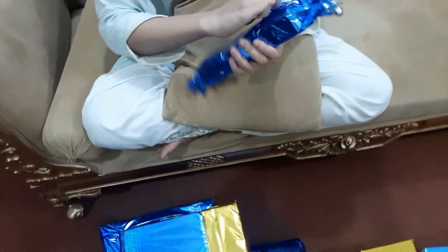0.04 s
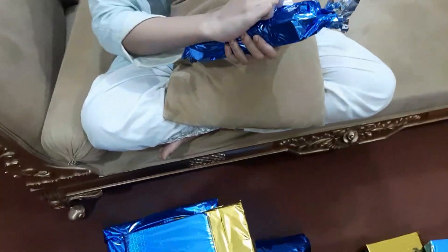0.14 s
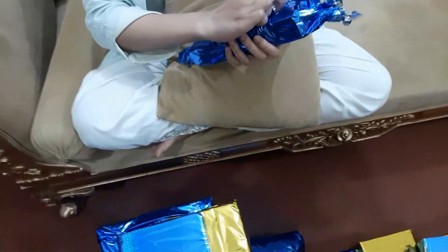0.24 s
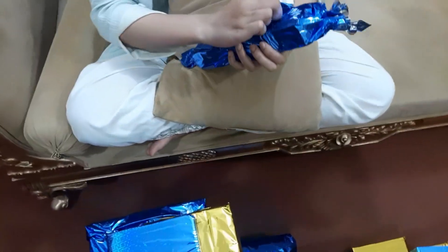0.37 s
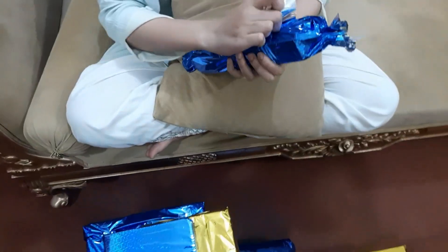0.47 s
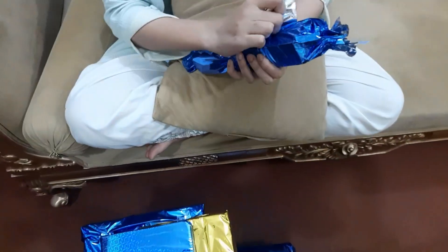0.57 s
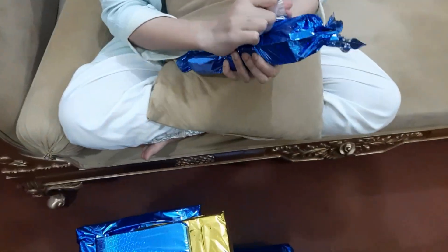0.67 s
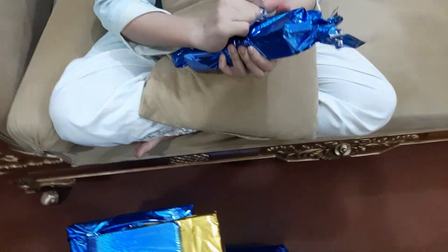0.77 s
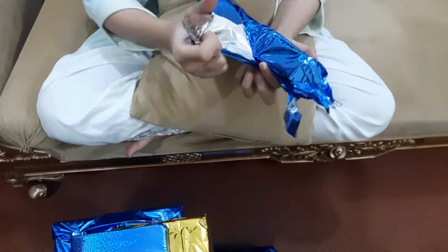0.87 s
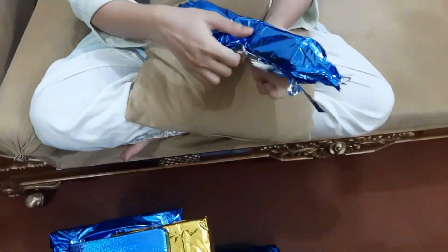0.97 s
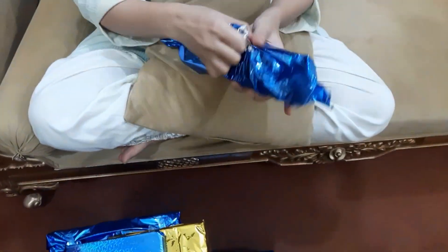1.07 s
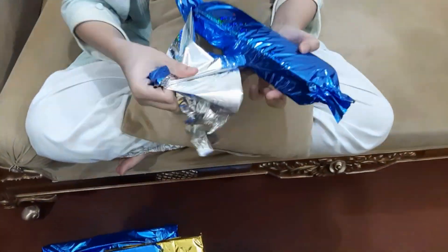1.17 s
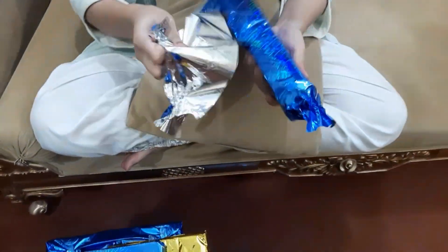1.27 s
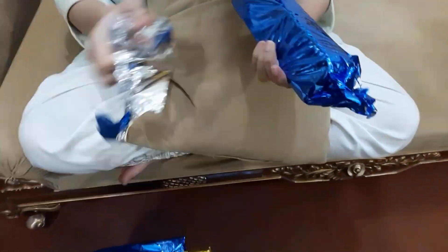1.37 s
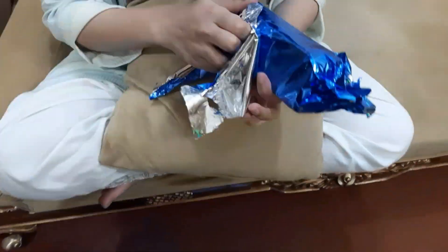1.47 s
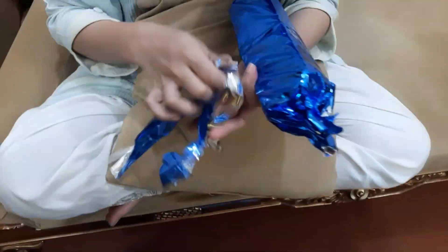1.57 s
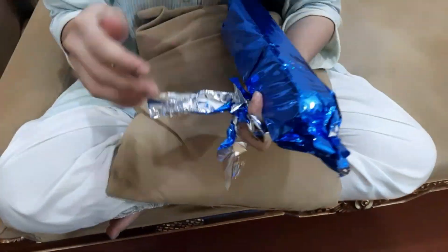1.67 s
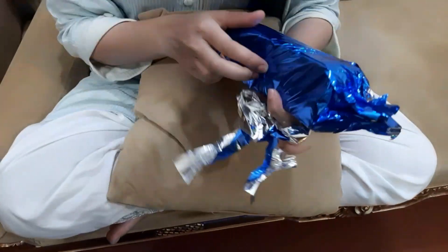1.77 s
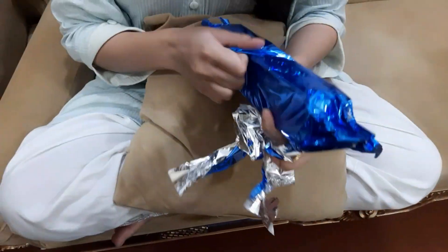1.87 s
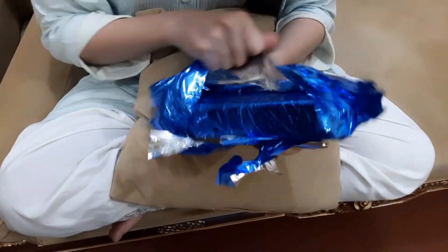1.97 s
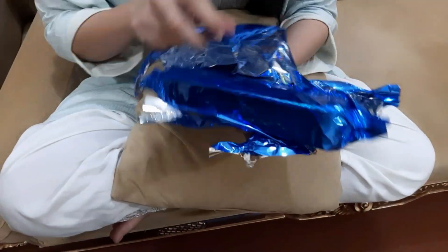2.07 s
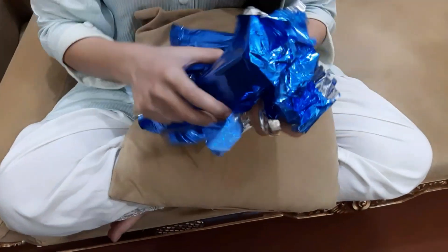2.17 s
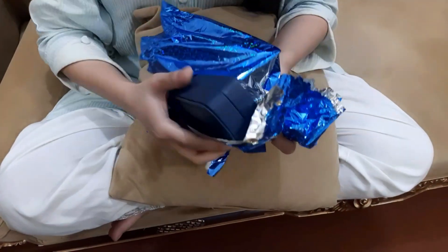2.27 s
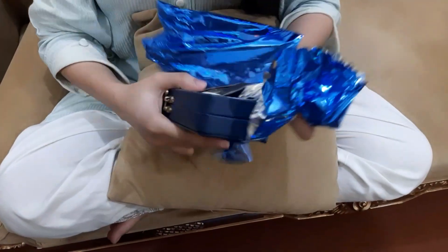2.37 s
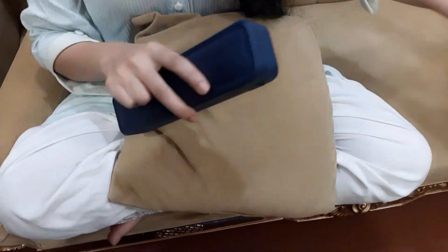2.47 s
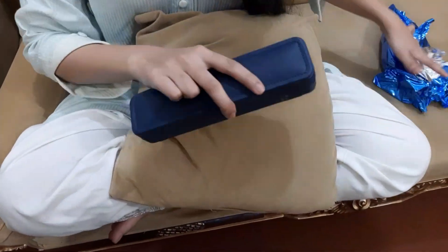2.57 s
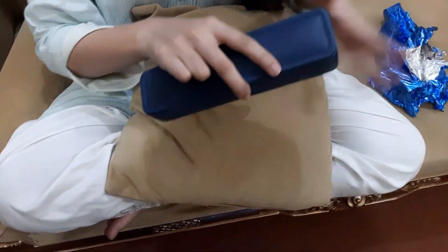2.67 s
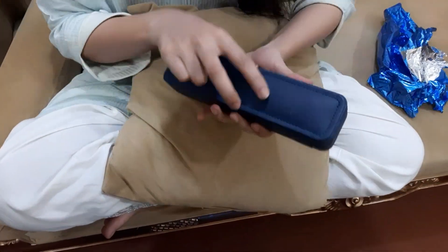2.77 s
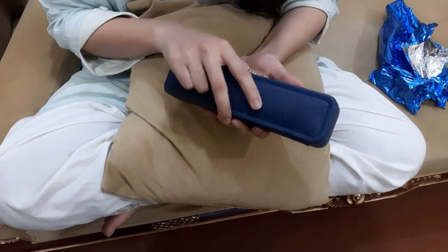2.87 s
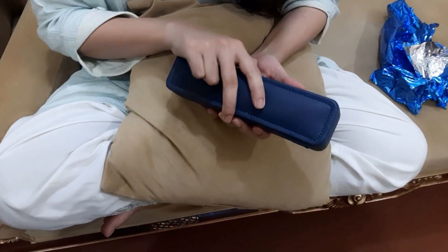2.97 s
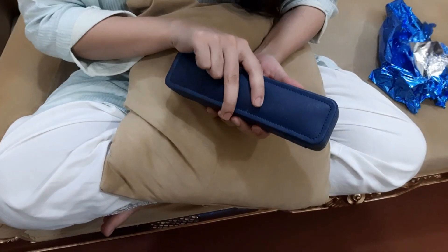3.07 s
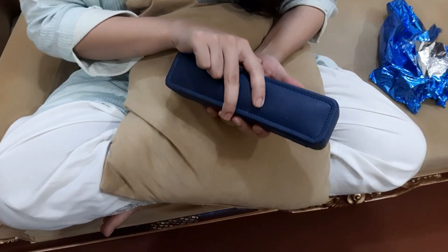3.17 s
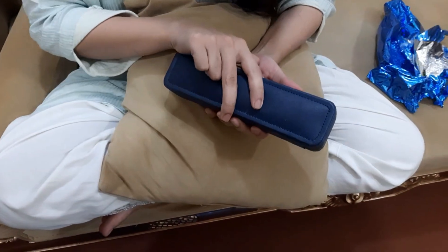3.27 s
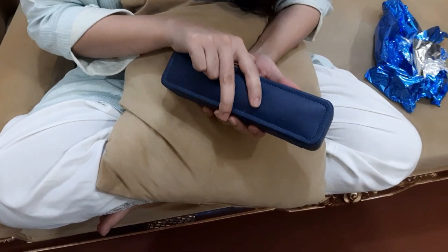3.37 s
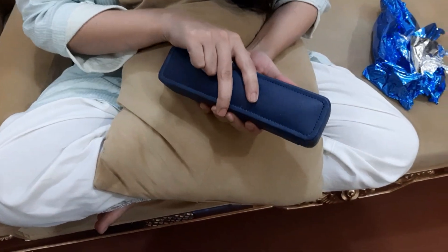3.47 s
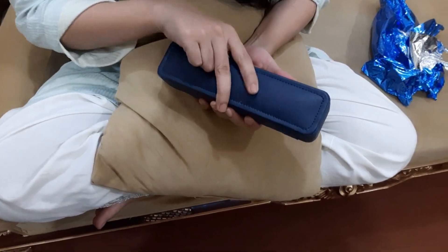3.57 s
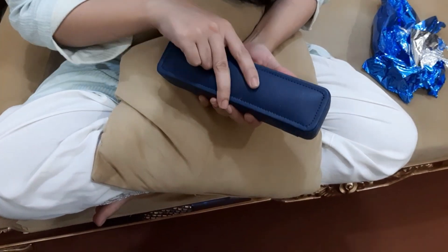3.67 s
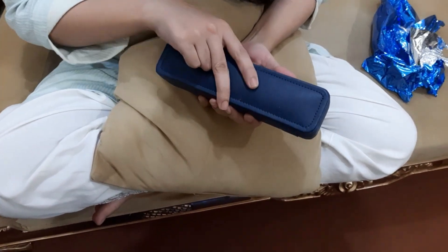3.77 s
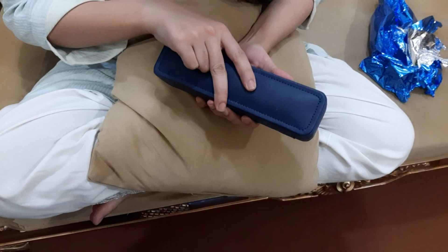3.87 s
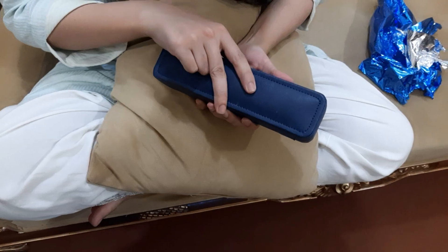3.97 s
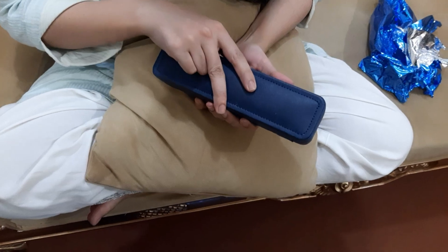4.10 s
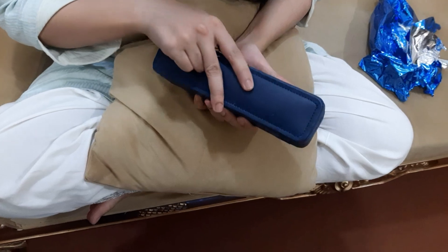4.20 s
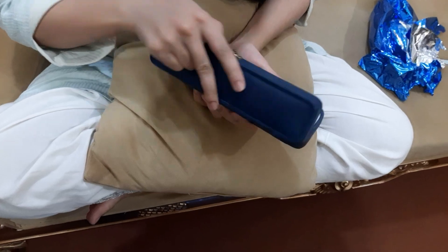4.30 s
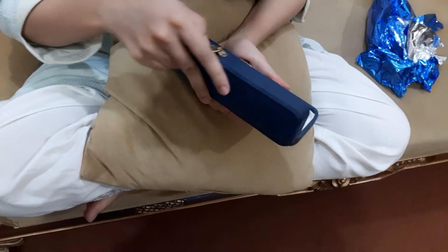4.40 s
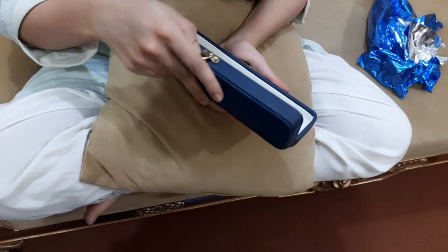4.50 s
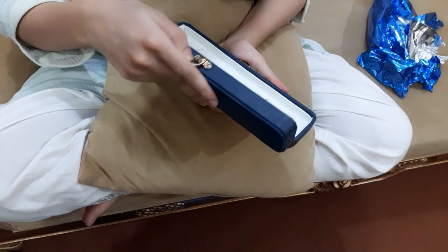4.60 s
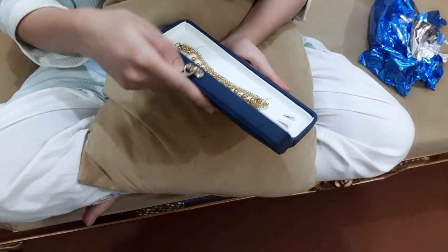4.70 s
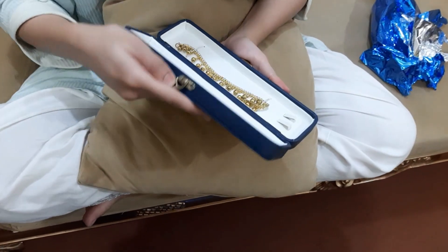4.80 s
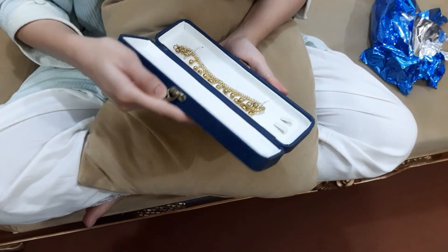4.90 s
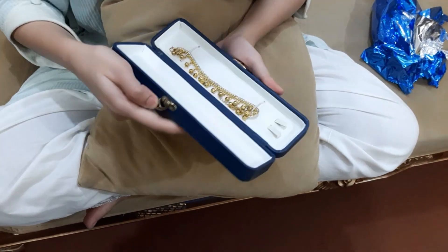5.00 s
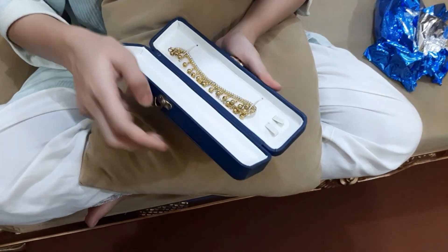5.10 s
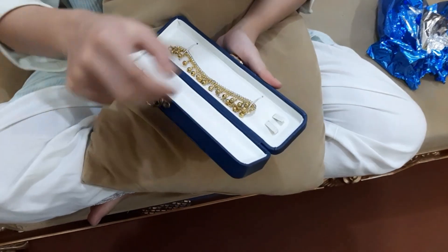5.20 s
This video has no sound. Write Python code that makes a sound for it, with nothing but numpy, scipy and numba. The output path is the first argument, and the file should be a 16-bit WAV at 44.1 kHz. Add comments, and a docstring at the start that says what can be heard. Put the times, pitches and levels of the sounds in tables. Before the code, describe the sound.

Bright, busy foil crinkling and ripping in a quiet furnished room gives way to soft rubs, hollow taps and one sharp latch click.

```python
"""Thin metallic foil is torn and crumpled off a small box by hand, at arm's length from two microphones.
The foil crackles in thousands of tiny ringing clicks, with flapping folds and some loud snaps.
Then fingers rub and tap on the box and its catch clicks open: grainy rubs, bright ticks and hollow rings.
A low rumble, a soft thud, a faint hiss and the noisy tail of a quiet furnished room lie around them."""
import sys
import numpy as np
from scipy import signal
from scipy.fft import rfft, irfft, next_fast_len
from scipy.io import wavfile
from scipy.ndimage import uniform_filter1d
from numba import njit

SR = 44100
rng = np.random.default_rng(int(sys.argv[2]) if len(sys.argv) > 2 else 0)


def gain_from_db(level_db):
    """Turn a decibel level (scalar or array-like) into a linear amplitude factor."""
    decades = np.asarray(level_db, float) / 20
    return 10 ** decades


def materialize(psi):
    """Save the field psi as 16-bit PCM at rate SR to the path in sys.argv[1].

    A 1-D psi becomes a single channel; in a 2-D psi each row is a channel.
    """
    bounded = np.clip(np.atleast_2d(psi).T, -1, 1)
    quanta = np.round(bounded * 32767).astype(np.int16)
    wavfile.write(sys.argv[1], SR, quanta)


N = 231390
T = np.arange(N) / SR  # time in seconds

# Steady part of the furniture rumble, before it wavers and loses its deepest bass.
# Each row: time in seconds, level in dB.
RUMBLE_LEVEL = [(0.0, -55.5), (1.0, -58.5), (2.0, -54.5), (2.8, -59), (3.7, -67), (4.6, -62.5),
                (5.25, -56.5)]
# Swells of rumble as the sitting body shifts.
# Each row: peak time in seconds, level in dB, rise in seconds, fall in seconds.
BODY_SHIFTS = [(0.24, -40.5, 0.032, 0.17), (0.51, -49, .05, 0.09), (0.86, -50, 0.33, 0.22),
               (1.29, -49, 0.38, 0.11), (1.58, -52, 0.14, 0.18), (1.86, -51.5, 0.11, 0.025),
               (2.02, -44, .1, 0.057), (2.12, -49, 0.11, 0.39), (2.37, -48, 0.052, 0.21),
               (2.561, -42.5, .06, 0.075), (2.859, -56.5, .05, 0.087), (3.22, -54.5, 0.12, 0.17),
               (3.5, -53.5, 0.48, 0.38), (4.1, -53.5, .4, 0.11), (4.19, -49, 0.037, 0.225),
               (4.43, -56.5, 0.23, 0.053)]
# Tone of the rumble. Each row: frequency in Hz, relative strength in dB per Hz.
RUMBLE_TONE = [(15, -44), (25, -14.5), (86, -1.5), (127, 0), (161, -7), (194, -4), (352, -10.5), (403, -15),
               (600, -29.5), (780, -69.5), (1320, -120)]
# Lean of the rumble to one side. Each row: frequency in Hz, left minus right in dB.
RUMBLE_PAN = [(60, 7), (110, 10), (200, 4.5), (380, 3.5), (700, 4), (1290, 2), (2380, -3.5), (4400, 4.5),
              (8120, 2), (15000, 1.0)]
# The microphones lose the deepest bass. Each row: frequency in Hz, gain in dB.
BASS_LOSS = [(15, -25), (45, -2)]
# Tone of the microphone hiss. Each row: frequency in Hz, relative strength in dB per Hz.
HISS_TONE = [(240, -29.5), (400, -5.5), (678, -7.5), (804, -4), (896, -12), (1430, -12.5), (2310, -13),
             (8240, -27.5), (15100, -19), (16300, -35.5)]
# Rings of a hollow thud on the seat.
# Each row: start in seconds, frequency in Hz, level in dB, rise in seconds, time to fall 60 dB in seconds.
SEAT_THUD = [(0.199, 189.7, -26, .01, 0.2), (0.203, 233, -30.5, 0.0087, 0.17), (.27, 99.4, -33, 0.085, .4)]
# Hands sliding on box and cushion.
# Each row: peak time in seconds, dull rub in dB, bright rub in dB, rise in seconds, fall in seconds.
HAND_SLIDES = [(2.75, -59.5, -61.5, 0.016, 0.029), (2.852, -55.5, -60, .02, .03),
               (2.877, -58, -56.5, .025, 0.025), (3.048, -75, -65, 0.016, 0.16),
               (3.115, -71, -73, 0.022, 0.15), (3.218, -52, -70, 0.092, .17),
               (3.309, -57.5, -79, 0.088, 0.16), (3.55, -68, -79, 0.16, 0.19),
               (3.834, -70, -99, 0.044, .07), (3.98, -73.5, -74, 0.026, 0.28),
               (4.11, -82, -79, 0.059, 0.11), (4.385, -71, -77, .02, 0.075), (4.6, -75, -74, 0.035, 0.13),
               (5.045, -72.5, -75, .03, 0.18), (5.14, -78, -75, .1, .1)]
# Tone of the dull rub. Each row: frequency in Hz, gain in dB.
DULL_TONE = [(250, 2), (450, 3.5), (1200, -2.5), (1800, -25), (3200, -45)]
# Tone of the bright rub. Each row: frequency in Hz, relative strength in dB per Hz.
BRIGHT_TONE = [(880, -28), (1500, -9), (2020, -1.5), (2840, -7), (6510, -5.5), (7710, -10), (8610, -35),
               (15100, -12), (16300, -33.5)]
# Fingers and catch on the box; the levels are relative, before the gains in taps() and scene().
# Each row: start in seconds, body level in dB, tick level in dB, tick pitch in Hz, left minus right in dB.
BOX_TAPS = [(2.737, -43, -72, 1483, 3.5), (2.843, -47, -66, 2520, -7), (3.038, -73, -49.5, 5480, 8.5),
            (3.109, -45, -57, 3270, 1), (3.129, -62, -52.5, 5000, 8.5), (3.21, -53, -52.5, 3010, -3),
            (3.268, -56, -52, 6040, -0.5), (3.315, -55, -60, 7590, -1), (3.444, -44, -84, 2535, 3.5),
            (3.4678, -34.5, -71, 2850, 7.5), (3.55, -35.5, -63, 4260, 2), (3.824, -55, -67, 4950, 19),
            (3.979, -60.5, -53, 6580, 2), (4.106, -63.5, -58.5, 3620, 0), (4.1785, -47, -53, 3470, 8),
            (4.1822, -60, -40.5, 5300, 4), (4.183, -25, -38, 2600, 11), (4.1838, -60, -43.5, 7300, 5),
            (4.1845, -58, -43.5, 3870, 3), (4.382, -58, -64, 4210, 4), (4.6, -76, -59, 4880, -2),
            (5.044, -55, -79, 2100, 12.5), (5.089, -53, -54, 6500, -0.5), (5.148, -65, -55, 4710, -0.5)]
# Ways the hollow box rings.
# Each row: frequency in Hz, relative level in dB, time to fall 60 dB in seconds.
BOX_RINGS = [(300, 3, 0.024), (485, -12, 0.02), (667, -11.5, 0.027), (2260, -27, 0.014), (930, -3.5, 0.009),
             (1168, -3.5, 0.013)]
# Single creases that snap; the peak is relative, before the gains in snaps() and scene().
# Each row: start in seconds, peak in dB, ring pitch in Hz, low pop against the peak in dB,
# left minus right in dB.
CREASE_SNAPS = [(0.0136, -20, 3300, -28, 3.5), (0.242, -31, 5840, -3.5, 3.5), (0.3423, -22, 5070, -11.5, 9),
                (0.385, -21.5, 2900, -4.5, 1), (0.4496, -23, 5440, -6.5, 2.5),
                (0.463, -14.5, 5830, -39, -2.5), (0.473, -20, 5400, -33, 2),
                (0.4954, -15.5, 5150, -25.5, 1), (0.5138, -21, 4120, -19, 1),
                (0.5235, -16.5, 5170, -18, 0.5), (0.545, -21.5, 5580, -25, -0.5),
                (0.5554, -4, 5800, -24, 3), (0.574, -16, 5000, -27, 3.5), (0.7178, -19, 4870, -15, 4.5),
                (0.723, -13, 5260, -41.5, -1), (0.83, -18.5, 3220, -28.5, 10.5),
                (0.8737, -22.5, 3650, -20.5, 7), (0.8986, -28, 3820, -22.5, 4),
                (0.9254, -24, 6440, -17, -0.5), (0.9683, -29, 2800, -1.5, 3),
                (0.9853, -20, 3240, -12.5, 2.5), (1.042, -22, 6100, -7.5, 4.5),
                (1.1053, -20, 2710, -11, 0.5), (1.1618, -15, 4560, -11, 1.5), (1.1746, -3, 4100, -24, -1),
                (1.213, -28, 5370, -26, -1.5), (1.2275, -24.5, 6100, -13.5, 0.5),
                (1.267, -21, 4870, -19, 2.5), (1.282, -8, 3820, -14.5, 5.5),
                (1.2898, -7.5, 3870, -29.5, -2), (1.395, -33.5, 4830, -29, 4),
                (1.4322, -21, 5840, -52, 0.5), (1.4533, -24, 5640, -6.5, -2), (1.5042, -25, 3330, -29, 1),
                (1.5953, -31.5, 3350, -4.5, 8.5), (1.6432, -21.5, 6900, -36, -5),
                (1.6616, -16, 4540, -23, -4), (1.745, -39.5, 6040, -25, -4.5), (1.763, -33.5, 5580, -31, 4),
                (1.776, -28, 6160, -24, -5.5), (1.8053, -10.5, 6600, -37.5, -3.5),
                (1.8525, -24, 5900, -34, 1), (1.9168, -21, 4500, -19.5, -0.5), (2.0378, -21, 5260, -16, 2),
                (2.06, -19.5, 5340, -15.5, -9), (2.0792, -20.5, 4900, -20, 13.5),
                (2.1191, -23.5, 5500, -8.5, 3.5), (2.174, -27, 5370, -30, 1.5),
                (2.1874, -20.5, 5260, -27.5, -1), (2.223, -14.5, 6130, -45, -0.5),
                (2.2932, -29, 5740, -3, -2), (2.326, -24.5, 3300, -11.5, 5), (2.395, -20.5, 3650, -20, 8.5),
                (2.4243, -24.5, 4440, -32, 1), (2.4586, -18.5, 6600, -29.5, 0.5),
                (2.5249, -29.5, 3910, -19, 14.5)]
# Pulls and squeezes of the foil.
# Each row: peak time in seconds, crackle in dB, rise in seconds, fall in seconds,
# flapping of the large folds against the crackle in dB.
FOIL_PULLS = [(0.035, -31.5, .04, 0.13, -9.5), (0.21, -42.5, .05, 0.35, -1), (0.33, -41, .05, 0.24, -10),
              (0.4, -38.5, .1, 0.14, -13), (0.47, -35.5, .05, 0.23, -11.5), (0.557, -28, .012, 0.16, -13),
              (0.632, -27, .12, 0.022, -9.5), (0.66, -37, .03, 0.15, -11.5),
              (0.717, -27.5, .035, 0.083, -10.5), (0.833, -30, .04, 0.027, -6.5),
              (0.879, -34.5, .04, 0.052, -6), (0.96, -44, .1, 0.26, -4.5), (1.044, -36, .12, 0.027, -8),
              (1.108, -31.5, .05, 0.075, -12), (1.14, -29.5, .04, 0.054, -1.5),
              (1.175, -30, .06, 0.011, -2.5), (1.23, -37, .12, 0.094, -9.5),
              (1.29, -16.5, .025, 0.032, -10), (1.33, -35.5, .03, 0.064, -14.5),
              (1.445, -42, .04, 0.13, -27), (1.506, -39, .08, 0.017, -5), (1.59, -40.5, .12, 0.036, -16.5),
              (1.665, -34.5, .12, 0.019, -5.5), (1.76, -49.5, .12, .08, -10),
              (1.804, -33.5, .015, 0.022, -15), (1.86, -31, .05, 0.068, -7), (1.93, -28.5, .1, 0.14, -13),
              (2.0, -26.5, .12, 0.12, -5), (2.137, -30, .07, .06, -6.5), (2.21, -28.5, .1, 0.094, -8),
              (2.3, -46.5, .08, 0.073, 0.5), (2.378, -29.5, .07, .08, -6), (2.43, -32, .05, 0.15, -15),
              (2.52, -44, .04, 0.052, -7.5), (2.574, -37.5, .09, 0.033, -6.5), (2.6, -53, .02, 0.071, -5)]
# Which part of the sheet is in the hands; both shares are set against the small creases.
# Each row: time in seconds, middle creases in dB, finest sizzle in dB, left minus right in dB.
FOIL_GRIP = [(0.0, -3, -19.5, 1.5), (0.15, -1.5, -8, 2), (0.46, -4.5, -19.5, 2.5), (0.63, -4.5, -3.5, 2),
             (0.72, -3.5, -15.5, 1), (0.9, -3.5, -5, 2), (1.18, -6.5, -8.5, 3), (1.3, -3, -10.5, 2.5),
             (1.5, -7.5, -11.5, 1.5), (1.67, -0.5, -2.5, 2), (1.8, -8, -5, 0.5), (2.0, -4.5, -8, 1),
             (2.2, -5, -10, 1), (2.42, -8, -9, 1), (2.7, -2, -10, -3)]
# Tone of the creases. Each row: frequency in Hz, relative strength in dB per Hz.
CREASE_TONE = [(820, -40), (1400, -14.5), (1940, -11), (2540, -9), (2930, -5.5), (3640, -6.5), (5600, -2.5),
               (7470, -8), (8540, -21.5), (11200, -7.5), (13600, -7), (15700, -8.5), (16300, -35.5)]
# Tone of the large folds. Each row: frequency in Hz, relative strength in dB per Hz.
FOLD_TONE = [(120, -35), (200, -4.5), (333, -1), (529, -2.5), (816, 1.5), (1020, 0.5), (2000, -3),
             (2600, -35.5), (4400, -120)]
# How the microphones take sharp sounds. Each row: frequency in Hz, gain in dB.
SHARP_TONE = [(100, -12.5), (6500, 7.0), (8500, -3), (11000, -6.5), (15000, -5.5), (17000, -27.0)]


def level(x, db):
    """Scale a sound to an average (rms) level in dB."""
    return x * gain_from_db(db) / np.sqrt(np.mean(x ** 2))


def colour(x, points):
    """Shape the tone by (Hz, dB) points joined on a logarithmic pitch scale."""
    hz, db = np.transpose(points)
    size = next_fast_len(N)
    f = np.arange(size // 2 + 1) * SR / size + 1
    gain = gain_from_db(np.interp(np.log(f), np.log(hz), db))
    return irfft(rfft(x, size) * gain, size)[..., :N]


def walk(rate):
    """Random values with a spread near 1, about `rate` new ones a second, joined by short ramps."""
    hold = int(SR / rate)
    steps = np.repeat(rng.standard_normal(N // hold + 1), hold)
    return uniform_filter1d(steps, hold // 2)[:N]


def pair(alike):
    """Two-channel noise whose sides agree by the given share, from 0 to 1."""
    mid, side = rng.standard_normal((2, N))
    alike = np.clip(alike, 0, 1)
    shared = np.sqrt(1 + alike) * mid
    opposed = np.sqrt(1 - alike) * side * np.array([[1], [-1]])
    return (shared + opposed) / np.sqrt(2)


def sides(pan_db):
    """Left and right gains for a left-minus-right difference in dB."""
    return gain_from_db(np.array([pan_db, -pan_db]) / 2)


def curve(rows):
    """Columns of a table joined by straight lines in time."""
    s, *columns = np.transpose(rows)
    return [np.interp(T, s, c) for c in columns]


def swells(s, db, rise, fall):
    """Gain in time: each movement rises to its peak and dies away; their powers add."""
    drop_db = 19.5  # reached one rise or fall away from the peak
    bend = 1.46  # 1 = pointed peak, 2 = rounded
    power = np.zeros(N)
    for peak, top_db, up, down in zip(s, db, rise, fall):
        near = slice(max(int((peak - 3 * up) * SR), 0), int((peak + 3 * down) * SR))
        away = np.abs(T[near] - peak) / np.where(T[near] < peak, up, down)
        power[near] += gain_from_db(top_db - drop_db * away ** bend) ** 2
    return np.sqrt(power)


@njit
def rings(s, hz, t60, left, right, lag, n, sr):
    """Damped sines; each reaches the two microphones up to a few samples apart."""
    out = np.zeros((2, n))
    for g in range(len(s)):
        # one sample's turn and decay; t60 is the time to fall 60 dB
        turn = np.exp(2j * np.pi * hz[g] / sr - np.log(1000) / (t60[g] * sr))
        i, z = int(s[g] * sr), 1 + 0j
        j = i + int(lag[g])
        for k in range(int(t60[g] * sr)):
            if min(i, j) + k >= 0 and max(i, j) + k < n:
                out[0, j + k] += left[g] * z.imag
                out[1, i + k] += right[g] * z.imag
            z *= turn
    return out


def crackle(count, lo_hz, hi_hz, cycles, spread_db, clump_db, lag=-5, lag_spread=3.5):
    """Dense clicks of random pitch, size and place, each dying in a set number of cycles, in clumps."""
    place, pitch, sign = rng.random((count, 3)).T
    strength, shift = rng.standard_normal((count, 2)).T
    s = place * N / SR
    hz = lo_hz * (hi_hz / lo_hz) ** pitch
    size = hz * gain_from_db(spread_db * np.clip(strength, -3, 2.6)) * np.sign(sign - .5)
    # clicks come in clumps as a crease runs
    clumps = gain_from_db(clump_db * (walk(35) + walk(180)))[(s * SR).astype(int)]
    return rings(s, hz, cycles / hz, size * clumps, size * clumps, lag + lag_spread * shift, N, SR)


def burst(s, peak_db, hz, pan_db, t60, width, stray_db):
    """Something gives way in a dying spray of tiny impacts: a ring near one pitch over a broad crack."""
    t = np.arange(2048) / SR
    f = np.arange(1025) * SR / 2048 + 1
    spray = rng.standard_normal((len(s), len(t) + 1))
    ring = np.exp(-(np.log(f / hz[:, None]) / width) ** 2)
    crack = gain_from_db(stray_db) * f / (f + hz[:, None])
    x = irfft(rfft(spray[:, 1:]) * (ring + crack))
    x = x * gain_from_db(-60 * t / t60) * np.minimum(t / 0.00044, 1)  # the onset takes 0.44 ms
    x = x * gain_from_db(peak_db[:, None]) / np.abs(x).max(axis=1)[:, None]
    lag = np.clip(-3.2 + .8 * spray[:, 0], -12, 12).astype(int)  # samples between the microphones
    out = np.zeros((2, N + len(t)))
    for row, i, shift, (left, right) in zip(x, (s * SR).astype(int), lag, sides(pan_db).T):
        out[0, i + shift:i + shift + len(t)] += left * row
        out[1, i:i + len(t)] += right * row
    return out[:, :N]


def background():
    """Low wavering rumble, mostly alike on both sides, and the microphones' own hiss: shaped noise."""
    strength = np.hypot(gain_from_db(curve(RUMBLE_LEVEL)[0]), swells(*np.transpose(BODY_SHIFTS)))
    left, right = level(colour(pair(.93), RUMBLE_TONE), 0.092) * strength * gain_from_db(1.3 * walk(11))
    hz, pan_db = np.transpose(RUMBLE_PAN)
    left = colour(left, np.c_[hz, pan_db / 2])
    right = colour(right, np.c_[hz, -pan_db / 2])
    rumble = colour(np.array([left, right]), BASS_LOSS)
    hiss = level(colour(pair(0.079), HISS_TONE), -71.5)
    return rumble + hiss


def thud():
    """A hollow thud on the seat: low rings that build up slowly and die away."""
    out = 0
    for s, hz, db, rise, t60 in SEAT_THUD:
        t = np.maximum(T - s, 0)
        envelope = gain_from_db(db - 60 * t / t60) * (1 - np.exp(-t / rise))
        out = out + envelope * np.sin(2 * np.pi * hz * t)
    return out * sides(3)[:, None]


def rubbing():
    """Skin on leatherette and cloth sticks and slips in fine grains: many tiny clicks, dull and bright."""
    s, dull_db, bright_db, rise, fall = np.transpose(HAND_SLIDES)
    dull = level(colour(crackle(15000, 350, 2900, 7.2, 4.9, 0.33), DULL_TONE), 0.17)
    bright = level(colour(crackle(40000, 1500, 25000, 9.9, 3.1, 2.0), BRIGHT_TONE), 3.6)
    rubs = swells(s, dull_db, rise, fall) * dull + swells(s, bright_db, rise, fall) * bright
    return sides(2.3)[:, None] * rubs


def taps():
    """A nail or catch ticks, and the hollow box rings under a soft push that blurs its treble."""
    contact_s = 0.00036  # a padded fingertip pushes this long
    s, body_db, tick_db, tick_hz, pan_db = np.transpose(BOX_TAPS)
    body = 0
    for hz, db, ring_s in BOX_RINGS:
        left, right = sides(pan_db) * gain_from_db(body_db + db)
        # the rings start 1.88 ms after the listed time
        body = body + rings(s + 0.00188, 0 * s + hz, 0 * s + ring_s, left, right, 0 * s - 4, N, SR)
    ticks = burst(s, tick_db + 9, tick_hz, pan_db, t60=.006, width=0.25, stray_db=-9.5)
    return ticks + uniform_filter1d(body, max(int(contact_s * SR), 1))


def snaps():
    """Loud creases give way: a bright burst and a low pop of the sheet."""
    s, peak_db, hz, low_db, pan_db = np.transpose(CREASE_SNAPS)
    bright = burst(s, peak_db + 2.5, hz, pan_db, t60=0.0086, width=0.17, stray_db=-3.0)
    pop_db = peak_db + low_db + 0.5
    pop = burst(s, pop_db, 0 * s + 850, pan_db, t60=0.025, width=0.76, stray_db=-25.5)
    return bright + pop


def foil():
    """Buckling foil: clicks of middle and small creases and finest sizzle over duller, flapping folds."""
    s, crackle_db, rise, fall, flap_db = np.transpose(FOIL_PULLS)
    middle_db, sizzle_db, pan_db = curve(FOIL_GRIP)
    middle = level(colour(crackle(22000, 1300, 3600, 8.4, 4.3, 1.2), CREASE_TONE), .5)
    small = level(colour(crackle(30000, 3600, 9000, 11.0, 4.2, 2.7), CREASE_TONE), 0.41)
    sizzle = level(colour(crackle(40000, 8500, 18000, 12.0, 4.5, 3.6), CREASE_TONE), 2.1)
    folds = level(colour(crackle(15000, 200, 1800, 7., 2.8, 2.3), FOLD_TONE), -2.6)
    creases = gain_from_db(middle_db) * middle + small + gain_from_db(sizzle_db) * sizzle
    crackling = swells(s, crackle_db, rise, fall) * creases
    flapping = swells(s, crackle_db + flap_db, rise, fall) * folds
    return sides(pan_db) * (crackling + flapping)


def room(x):
    """Echo tail of dying noise: long waves reach both microphones more alike, the treble dies sooner."""
    bass_t60_s, treble_t60_s = 0.43, 0.29  # time to fall 60 dB
    t = np.arange(int(.5 * SR)) / SR
    bass = uniform_filter1d(pair(0.3)[:, :len(t)], size=21)
    noise = pair(0)[:, :len(t)]
    treble = noise - uniform_filter1d(noise, size=21)
    tail = bass * gain_from_db(-60 * t / bass_t60_s) + 2.7 * treble * gain_from_db(-60 * t / treble_t60_s)
    tail = tail * np.clip(t / 0.012, 0, 1) ** 2  # builds up as the first echoes arrive
    tail = tail / np.sqrt(np.sum(tail ** 2) / 2)
    return gain_from_db(-8.5) * signal.fftconvolve(x.mean(axis=0)[None], tail, axes=1)[:, :N]


def scene():
    """Everything near the hands, its room tail, the thud and the background."""
    foil_hits = colour(snaps(), SHARP_TONE)
    box_hits = colour(taps(), SHARP_TONE)
    near = foil() + rubbing() + foil_hits + box_hits
    # the hands shade the box, so more of it arrives by way of the walls
    echoes = room(near + gain_from_db(8.5) * box_hits)
    return near + echoes + thud() + background()


def top_cut(x):
    """Nothing passes above the cut-off."""
    return signal.sosfilt(signal.butter(12, 16460, fs=SR, output="sos"), x)


def record(dry):
    """Any peak beyond full scale is cut flat."""
    return top_cut(np.clip(dry, -1, 1))


dry = scene()
out = record(dry)
materialize(out)
```